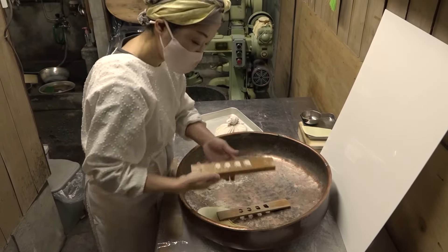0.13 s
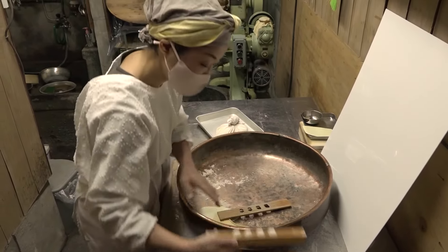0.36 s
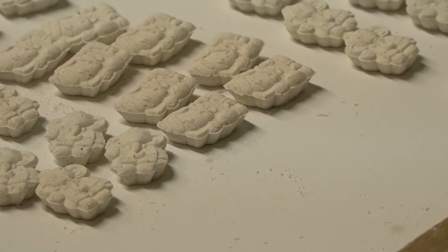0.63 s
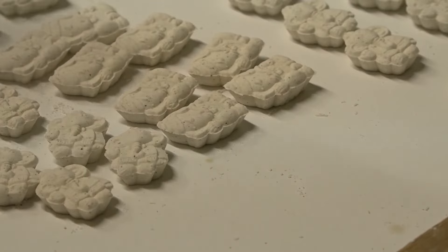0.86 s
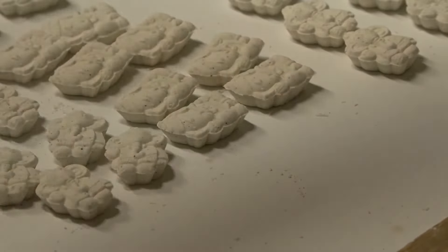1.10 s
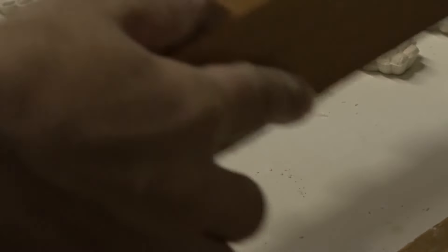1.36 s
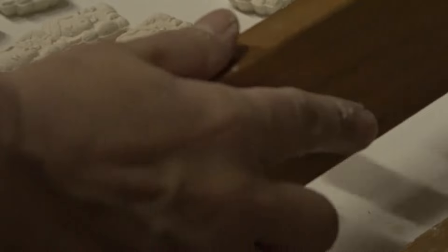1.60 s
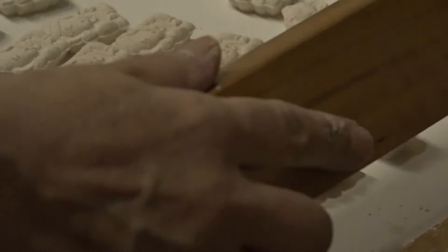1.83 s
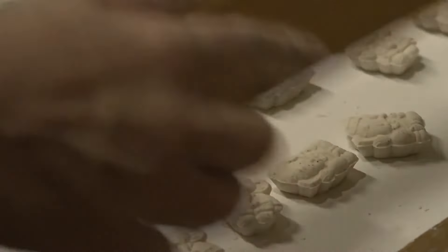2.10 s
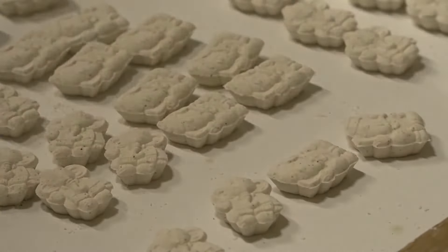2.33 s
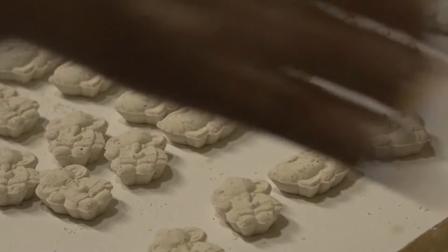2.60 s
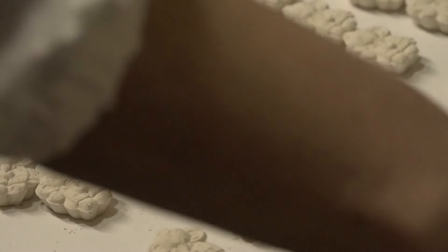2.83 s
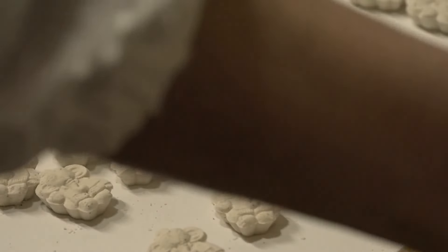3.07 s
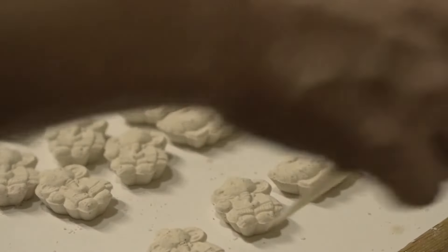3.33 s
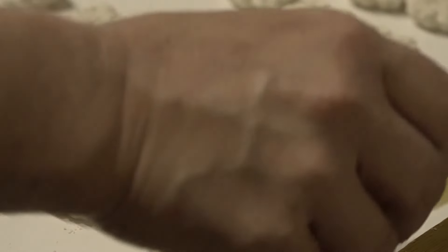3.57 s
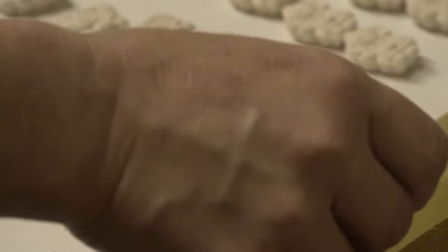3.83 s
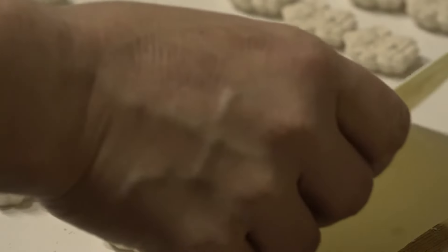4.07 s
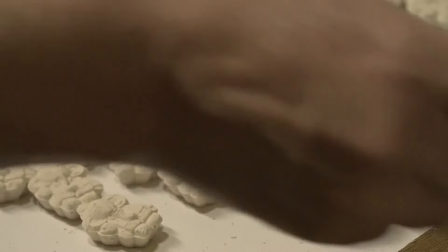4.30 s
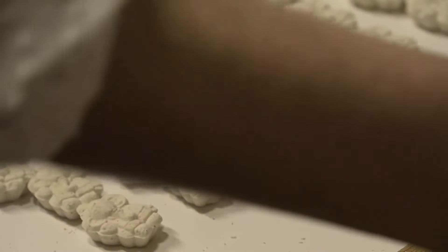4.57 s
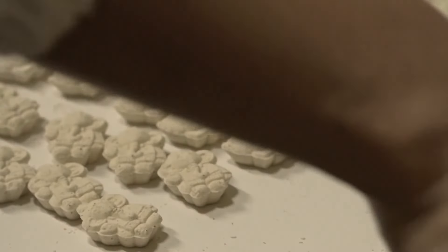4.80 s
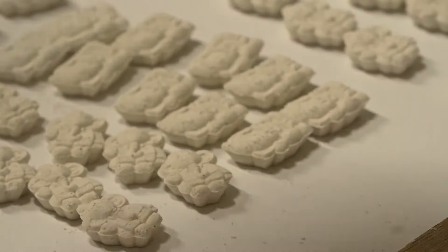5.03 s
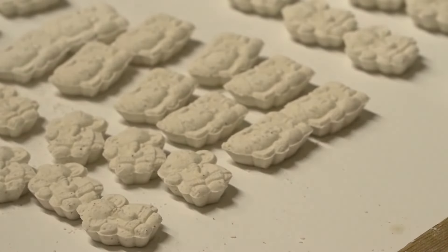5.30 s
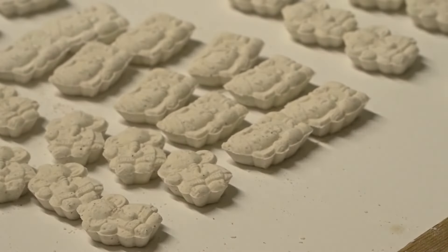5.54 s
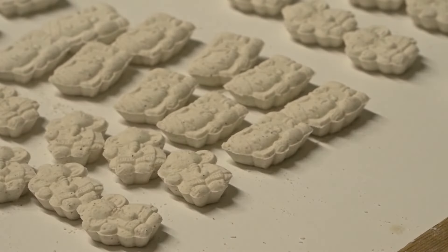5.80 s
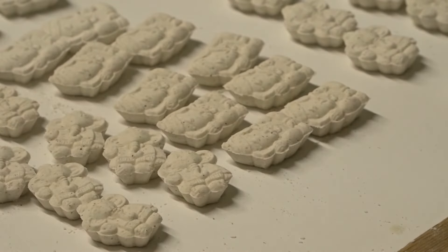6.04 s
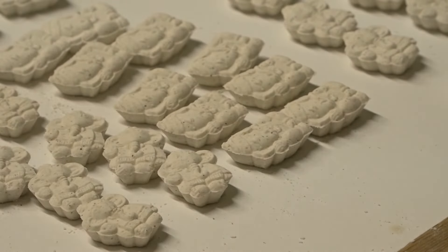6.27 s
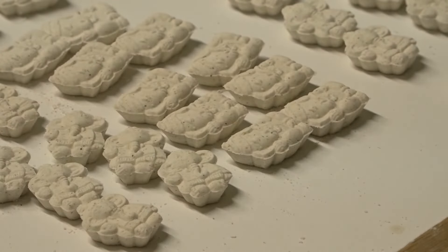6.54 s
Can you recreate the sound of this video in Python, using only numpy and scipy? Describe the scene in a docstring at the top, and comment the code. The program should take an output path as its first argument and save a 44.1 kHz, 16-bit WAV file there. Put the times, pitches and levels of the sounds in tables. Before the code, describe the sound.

Sharp wooden knocks on a board, gritty scraping of dry sugar pieces, then a harder clack with a rattle and soft rubbing.

```python
"""A wooden mould is knocked on a board: each blow rings its wood modes and cracks on its hard face.
Later the mould is dropped, bounces and rattles to rest. Hard grains snap as tones in bursts of noise.
Sugar pieces are slid about: crushed grit hisses between hand, sugar and wood, and the board rings below.
Filtered noise makes a small workshop's hiss and the table's rumble. The sound fades out at the end."""
import sys
import numpy as np
from scipy import signal
from scipy.fft import rfft, irfft, next_fast_len
from scipy.io import wavfile

SR = 44100
rng = np.random.default_rng(int(sys.argv[2]) if len(sys.argv) > 2 else 0)


def elevation(decibels):
    """Turn decibel levels (scalar or array-like) into linear amplitude ratios."""
    levels = np.asarray(decibels, float)
    return 10 ** (levels / 20)


def store_wav(level_fs):
    """Save 16-bit WAV to argv[1]."""
    pcm = np.round(np.clip(np.atleast_2d(level_fs), -1, 1) * 32767)
    wavfile.write(sys.argv[1], SR, pcm.T.astype(np.int16))


N = 293244   # length in samples

# Blows of the mould on the board: (time [s], drive level [dB], crack [dB re drive], favoured pitch [Hz])
BLOWS = [(0.708, -37.5, -5, 1110), (0.722, -39.5, -4, 720), (1.6879, -10.5, -15.5, 1120),
         (1.708, -10, -17, 620), (1.72, -15, -20.5, 970), (1.752, -33.5, -9, 900), (1.773, -19, -13, 940),
         (1.779, -18, -16, 930), (1.79, -15.5, -18, 1020), (1.8771, -11.5, -25, 555),
         (1.882, -20, -11.5, 1030), (1.889, -17, -23, 1080), (1.909, -24, -14.5, 815),
         (1.944, -25, -17.5, 606), (2.857, -42, -2, 2000), (3.646, -41.5, 7.5, 799),
         (3.668, -26.5, -7, 970), (4.6526, -8, -9.5, 1190), (4.673, -35.5, -7.5, 960),
         (4.6948, -18, -2, 1500), (4.714, -26, -30, 1030), (4.7832, -19, -4.5, 1500),
         (4.797, -24, -10, 1290), (4.841, -22.5, -14.5, 1320), (4.911, -32.5, -12, 1280),
         (4.949, -39, -31, 1310), (4.99, -38.5, -24, 1450), (5.2784, -41, 2, 1100),
         (5.375, -41.5, -19, 520), (5.409, -48, -20, 620), (5.44, -50, -23, 520)]
# Resonances of the wooden mould: (frequency [Hz], level [dB], t60 [s])
MOULD_MODES = [(449, -9.5, 0.3), (464, -6.5, 0.037), (535.5, 0, 0.047), (551.3, -4, 0.14), (606, -4, .09),
               (713, -8.5, 0.055), (797, -8, 0.045), (894, -2, 0.051), (979, -5, 0.047),
               (1030, -1.5, 0.041), (1215, 4.5, 0.017), (1353, 0.5, 0.046), (1500, 0, 0.023),
               (1650, 3, 0.028), (1636, 3.5, 0.051), (1920, 2.5, 0.018), (2090, 0.5, 0.041),
               (2314, -4.5, 0.057), (2393, 5.5, 0.015), (2560, 5.5, 0.013)]
# Resonances of the mould's hard face: (frequency [Hz], level [dB], t60 [s])
FACE_MODES = [(3320, 3, 0.005), (4050, 3, 0.0049), (4950, -2, 0.0049), (5420, -7.5, 0.012),
              (6900, -3.5, 0.0027), (9140, -14.5, 0.0056)]
# Hard grains and edges snapping: (time [s], drive level [dB], pitch [Hz])
SNAPS = [(2.8083, -24, 12600), (2.898, -24, 4100), (3.1265, -14.5, 3300), (3.804, -23, 4350),
         (3.8408, -12.5, 3600), (3.886, -20, 9000), (3.897, -15, 8600), (3.915, -16, 4400),
         (3.9574, -20, 4410), (4.042, -15.5, 4130), (4.108, -24, 9500), (4.14, -28.5, 9000),
         (4.6529, -18.5, 3700), (4.6932, -18, 3720), (4.78, -21, 4900), (4.7832, -13, 8720),
         (4.8614, -14.5, 8900), (4.9205, -27.5, 5760), (4.9314, -44, 4400), (4.9863, -32.5, 7000),
         (5.043, -35.5, 4500)]
# Rubbing strokes, and the dropped mould rattling as it rocks to rest (4.66-5.06 s), one list each:
# (time [s], grit level [dB], weight on the board [dB re grit])
RUBS_AND_RATTLE = [
    [(1.08, -73, -2), (1.15, -58.5, -6), (1.408, -52, -16), (1.55, -63.5, -15)],
    [(2.105, -56, -20), (2.125, -49, -22), (2.145, -67, -20), (2.248, -50.5, -14), (2.354, -60, -29),
     (2.412, -42, -35), (2.438, -50.5, -25), (2.456, -44.5, -23), (2.526, -55, -21), (2.75, -57, -8)],
    [(2.79, -71, -12), (2.814, -45, -25), (2.836, -50, -27), (2.89, -44.5, -6), (2.899, -33, -5.5),
     (2.912, -37.5, -14), (2.93, -32, -17.5), (2.97, -49.5, 0)],
    [(2.98, -44, -2), (3.022, -43.5, -8), (3.04, -31, -13.5), (3.052, -35, -13), (3.07, -32.5, -25),
     (3.116, -39.5, -15), (3.13, -31, -15), (3.142, -43.5, -11), (3.16, -49.5, 0)],
    [(3.17, -47, -23), (3.206, -39, -38), (3.232, -43.5, -24), (3.286, -45, -33), (3.322, -51, -35),
     (3.5, -71, -29)],
    [(3.634, -77, -28), (3.656, -40.5, -6), (3.676, -55.5, 14.5), (3.74, -63.5, -2)],
    [(3.75, -53, -12), (3.775, -38.5, -10), (3.81, -32, -9), (3.862, -38, -1), (3.912, -36, -7.5),
     (3.972, -40, 5), (4.04, -38.5, -4.5), (4.065, -42.5, -6), (4.09, -40, 5), (4.176, -44.5, 3.5),
     (4.214, -51.5, 4), (4.27, -58.5, -9)],
    [(4.28, -64, -5), (4.32, -49.5, -20), (4.378, -40, -22), (4.44, -44.5, -20.5), (4.47, -55, -15)],
    [(4.5, -52.5, -23), (4.538, -45, -25), (4.568, -52, -21), (4.58, -46, -16), (4.63, -49.5, -46)],
    [(4.659, -47.5, 19.5), (4.72, -45, 17), (4.77, -44.5, 7), (4.8, -48, 16.5), (4.88, -60, 18),
     (5.06, -78, 14)],
    [(5.3, -66, -19), (5.324, -52.5, -10), (5.39, -62, -5), (5.55, -63.5, -4)],
    [(5.82, -67, -15), (5.85, -47, -21), (5.89, -49.5, -22), (5.91, -42.5, -24), (5.964, -42, -33),
     (6.038, -42, -23), (6.122, -50, -19), (6.174, -46, -22), (6.244, -53, -21), (6.288, -65, -18)],
    [(6.375, -74, 2), (6.4, -63, -10), (6.432, -61, -10), (6.65, -91.5, 10)],
]
# Tone of each rub or rattle, in order:
# (finest grit [dB re grit], sugar body before its share of the weight [dB re grit], favoured pitch [Hz])
RUB_TONES = [(-18.5, 1, 730), (-6, -8, 890), (-10.5, 4, 1330), (-9.5, -1, 1300), (-5.5, 2.5, 550),
             (0.5, 5, 920), (-8.5, 3, 830), (-4, 0.5, 1200), (-8, -6, 1500), (-18.5, -2.5, 1700),
             (-12, 0, 630), (-8.5, -2, 1800), (-10, 1.5, 580)]
# Spectrum of crushed grit: (frequency [Hz], density [dB per Hz])
GRIT_SPECTRUM = [(1820, -15), (3100, -7), (3530, -4.5), (3810, -3), (5010, -2), (5870, -5.5), (8740, -8.5),
                 (11600, -12.5), (15100, -26), (16000, -28)]
# Resonances of the board under a sliding piece or the rocking mould: (frequency [Hz], level [dB], t60 [s])
BOARD_MODES = [(480.7, 1.5, 0.05), (601, -4, 0.041), (798, -2, 0.08), (882, -4.5, 0.13), (998, -1, 0.038),
               (1206, -3.5, 0.023), (1420, 0.5, 0.023), (1646, -5.5, 0.037), (1825, 2.5, 0.043),
               (2204, 2.5, 0.019), (2376, -6, 0.062), (2570, -8, 0.093)]
# Spectrum of the workshop hiss: (frequency [Hz], density [dB per Hz])
AIR_SPECTRUM = [(18, -56.5), (30, -42), (66, -15), (115, -3.5), (180, -10.5), (384, -17), (486, -5),
                (702, -10), (988, 0), (1190, -7.5), (2480, -7.5), (2900, -7.5), (3220, -7.5), (4000, -2.5),
                (4400, 1.5), (4800, -2), (5250, -1.5), (10200, -8), (16000, -36)]
# Level of the workshop hiss, including the fade-out at the end: (time [s], hiss level [dB])
HISS_LEVEL = [(0, -54), (.45, -52.5), (.6, -55), (1.1, -55), (2.0, -52.5), (2.7, -51), (3.5, -50.5),
              (4.5, -49.5), (5.1, -56.5), (5.8, -60), (6.3, -64.5), (6.65, -94.5)]
# Low shudders of the table under blows and leaning hands:
# (time [s], level [dB], time of the last 15 dB of rise [s], t60 [s])
TABLE_SHUDDERS = [(0.72, -64, 0.03, 1.5), (1.28, -64, 0.14, 1.2), (1.7, -49, 0.013, 0.69),
                  (1.8, -51, 0.03, 0.25), (1.89, -55.5, 0.03, 0.54), (2.96, -60.5, 0.12, 1.6),
                  (4.0, -56, 0.06, 0.96), (4.67, -50, 0.018, 1.05), (5.39, -62, 0.069, 0.54),
                  (5.85, -73, 0.037, 2), (6.39, -75, 0.04, 0.67)]

CHATTER_S, CRACK_S = 0.013, 0.013   # time for the contacts after a blow to fall to 1/e
HARD_SHARE = 0.88   # a harder blow has a sharper impact: share of the crack dB
BASS_CUT_HZ = 300
SUGAR_NOISE, BOARD_NOISE = 2.23, 0.3   # gain of plain grit beside the ringing
SUGAR_FOLLOWS = 0.43   # share of the weight's dB that the sugar body takes
TABLE_REST_DB = -24   # resting rumble re the hiss
ROOM_T60_S, WALL_CUT_HZ, ROOM_DB = 0.35, 5700, -18.5
NOTCH_HZ, NOTCH_WIDE_HZ = 2895, 407


def knocks():
    """Each blow is a click and a dying chatter of contacts; the spot hit favours modes near one pitch."""
    t = np.arange(2200) / SR
    force, crack, contact = np.zeros(N), np.zeros(N), np.zeros(N)
    spot_hz = np.full(N, 1000.)
    chatter = rng.standard_normal((len(BLOWS), 2, len(t)))
    for (s, drive_db, crack_db, hz), (low, high) in zip(BLOWS, chatter):
        at = int(s * SR)
        force[at] += elevation(drive_db - 12)
        force[at:at + len(t)] += elevation(drive_db - 37) * low * np.exp(-t / CHATTER_S)
        contact[at] -= elevation(drive_db + HARD_SHARE * crack_db + 20.5)
        crack[at:at + len(t)] += elevation(drive_db + crack_db - 4.0) * high * np.exp(-t / CRACK_S)
        spot_hz[at:] = hz   # holds until the next blow
    body = ringing(force, MOULD_MODES, near(spot_hz, 6.0))
    impact = band(contact, 600, 6500, order=3)
    face = elevation(-16.5) * ringing(crack, FACE_MODES)
    return body + impact + face + 0.19 * band(crack, 1500, 11000)


def ticks():
    """A snapping grain gives a tone of a few milliseconds inside a slightly longer burst of noise."""
    out = np.zeros(N)
    t = np.arange(600) / SR
    bursts = rng.standard_normal((len(SNAPS), len(t)))
    for (s, drive_db, hz), noise in zip(SNAPS, bursts):
        tone = 0.54 * np.sin(2 * np.pi * hz * t) * elevation(-60 * t / 0.006)
        click = 0.44 * noise * elevation(-60 * t / 0.013)
        at = int(s * SR)
        out[at:at + len(t)] += elevation(drive_db) * (tone + click)
    return band(out, 2700, 12500)


def rub_curves():
    """Joins the rubs and the rattle into running levels, with silence between those that lie apart."""
    rows = []
    for rub, (fine_db, sugar_db, hz) in zip(RUBS_AND_RATTLE, RUB_TONES):
        start = rub[0][0]
        if not rows or start - rows[-1][0] > 0.03:
            if rows:
                rows.append((rows[-1][0] + 0.01, -80, *rows[-1][2:]))
            rows.append((start - 0.01, -80, 0, 0, 0, hz))
        for s, grit_db, weight_db in rub:
            rows.append((s, grit_db, fine_db, sugar_db + SUGAR_FOLLOWS * weight_db, weight_db, hz))
    return in_time(rows)


def rubbing_and_rattle():
    """Grit crushed under strokes and the rocking mould hisses; the weight shakes sugar and board."""
    grit_db, fine_db, sugar_db, board_db, spot_hz = rub_curves()
    crush = rms_one(grains(9000, spread_db=1.4, clump_db=1.37))
    chimes = crystals(grains(1500, spread_db=0.0, clump_db=-1.5), cycles=120.0)
    hiss = coloured(crush + 0.45 * chimes, GRIT_SPECTRUM)
    shaking = grains(2500, spread_db=1.5, clump_db=3.0)
    wood = rms_one(ringing(shaking, BOARD_MODES, near(spot_hz, 5.0)))
    out = rms_one(band(hiss, 2900, 8000))
    out += elevation(fine_db) * rms_one(band(hiss, 8000, 16000))
    out += elevation(sugar_db) * rms_one(band(wood + SUGAR_NOISE * crush, 1146, 2880))
    out += elevation(board_db) * rms_one(band(wood + BOARD_NOISE * crush, 470, 1400))
    return elevation(grit_db) * out


def grains(per_s, spread_db, clump_db):
    """Grains give way as random clicks of uneven size that come in clumps."""
    sizes = elevation(spread_db * np.minimum(rng.exponential(1, N), 5)) * rng.choice([-1, 1], N)
    return sizes * (rng.random(N) < per_s / SR) * elevation(clump_db * drift(25))


def crystals(crush, cycles):
    """Each crushed grain rings at one of 24 pitches, dying by 60 dB in the given cycles."""
    pitches = np.geomspace(3100, 13000, num=24)
    dealt = rng.integers(0, 24, N)
    voices = (ring(crush * (dealt == k), hz, cycles / hz) * np.sqrt(hz) for k, hz in enumerate(pitches))
    return rms_one(sum(voices))


def workshop():
    """Distant hiss, wavering slightly and fading at the end, over a table rumble that swells and dies."""
    level_db, t = in_time(HISS_LEVEL)[0], np.arange(N) / SR
    hiss = elevation(level_db + 0.5 * drift(26)) * coloured(rng.standard_normal(N), AIR_SPECTRUM)
    shudder = elevation(level_db + TABLE_REST_DB)
    for s, top_db, rise, t60 in TABLE_SHUDDERS:
        swell_db = np.where(t < s, 15 * (t - s) / rise, -60 * (t - s) / t60)
        shudder = np.maximum(shudder, elevation(top_db + swell_db))
    return hiss + shudder * rms_one(band(rng.standard_normal(N), 190, 400))


def room(x):
    """Ten feedback delays stand for echoes between walls, duller on every round."""
    out, dull = np.zeros(N), np.exp(-2 * np.pi * WALL_CUT_HZ / SR)
    lags = (np.geomspace(0.007, 0.031, num=10) * SR).astype(int)
    for k, lag in enumerate(lags):
        loop, state = x.copy(), [0.]
        gain = elevation(-60 * lag / SR / ROOM_T60_S)
        for i in range(lag, N, lag):
            back, state = signal.lfilter([gain * (1 - dull)], [1, -dull], loop[i - lag:i], zi=state)
            loop[i:i + lag] += back[:N - i]
        out += (loop - x) * (-1) ** k
    return out


def ringing(x, modes, favour=lambda hz: 1):
    """A force excites a set of modes, with alternating signs."""
    out = np.zeros(N)
    for k, (hz, level_db, t60) in enumerate(modes):
        out += elevation(level_db) * ring(x * favour(hz), hz, t60) * (-1) ** k
    return out


def near(spot_hz, steep_db):
    """Modes are driven less the further they lie from the favoured pitch, in dB per squared octave."""
    return lambda hz: elevation(-steep_db * np.log2(hz / spot_hz) ** 2)


def ring(clicks, hz, t60):
    """A two-pole resonator: a unit click starts a dying sine of height 1."""
    r, w = elevation(-60 / (t60 * SR)), 2 * np.pi * hz / SR
    return signal.lfilter([0, np.sin(w)], [1, -2 * r * np.cos(w), r * r], clicks + 1e-18)


def band(x, low_hz, high_hz, order=4):
    """Steep Butterworth band-pass."""
    return signal.sosfilt(signal.butter(order, [low_hz, high_hz], "band", fs=SR, output="sos"), x)


def coloured(x, spectrum):
    """Shapes a sound by a (frequency [Hz], level [dB]) spectrum, at rms 1."""
    hz, level_db = np.transpose(spectrum)
    size = next_fast_len(N)
    grid = np.log(np.fft.rfftfreq(size, 1 / SR) + 1)
    gain = elevation(np.interp(grid, np.log(hz), level_db))
    return rms_one(irfft(rfft(x, size) * gain, size)[:N])


def drift(rate_hz):
    """Slow random wandering of rms 1: low-passed noise, made at a fortieth of the sample rate."""
    r = np.exp(-80 * np.pi * rate_hz / SR)
    noise = rng.standard_normal(N // 40 + 2002)
    slow = signal.lfilter([1], [1, -2 * r, r * r], noise)[2000:]   # skip the filter's settling
    return np.interp(np.arange(N) / 40, np.arange(len(slow)), rms_one(slow))


def in_time(rows):
    """Draws each column of a timed table as a curve, one value per sample."""
    s, *columns = np.transpose(rows)
    return [np.interp(np.arange(N) / SR, s, c) for c in columns]


def rms_one(x):
    """Scales to rms 1."""
    return x / np.sqrt(np.mean(x ** 2) + 1e-20)


def scene():
    """Hits with their room, then rubs and workshop; small wooden things send out little bass."""
    bass_cut = signal.butter(3, BASS_CUT_HZ, "high", fs=SR, output="sos")
    hits = signal.sosfilt(bass_cut, knocks() + ticks())
    mix = hits + elevation(ROOM_DB) * room(hits) + rubbing_and_rattle() + workshop()
    return mix[None]   # one channel


def top_cut(x):
    """Nothing passes above the cut-off."""
    return signal.sosfilt(signal.butter(12, 16480, fs=SR, output="sos"), x)


def record(dry):
    """The sound is low-passed at 16 kHz and has a narrow notch near 3 kHz."""
    low_pass = signal.butter(8, 15900, fs=SR, output="sos")
    b, a = signal.iirnotch(NOTCH_HZ, NOTCH_HZ / NOTCH_WIDE_HZ, fs=SR)
    finished = signal.lfilter(b, a, signal.sosfilt(low_pass, dry))
    return top_cut(finished)


dry = scene()
out = record(dry)
store_wav(out)
```